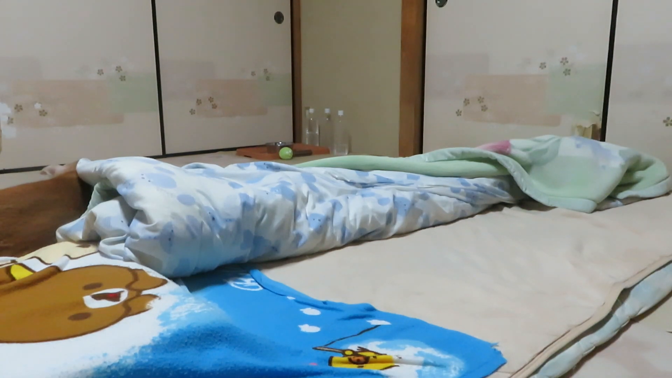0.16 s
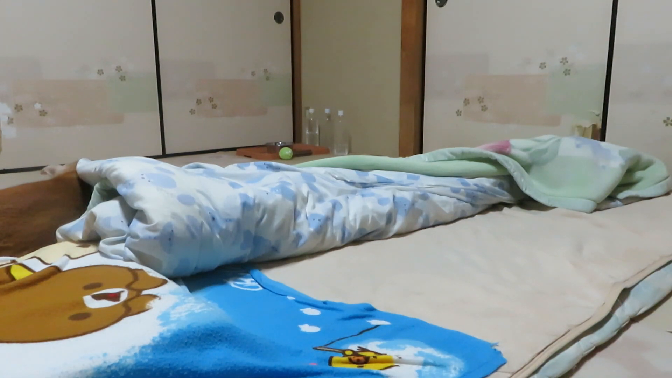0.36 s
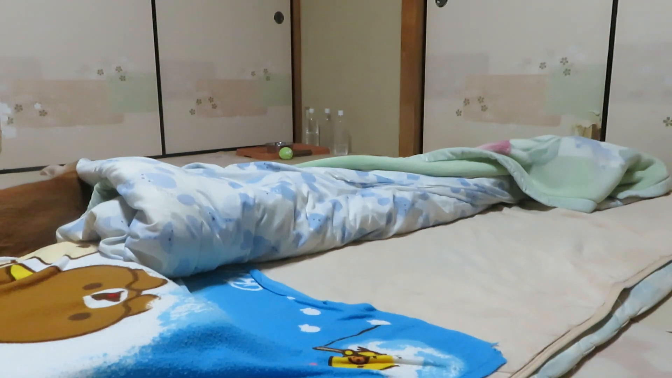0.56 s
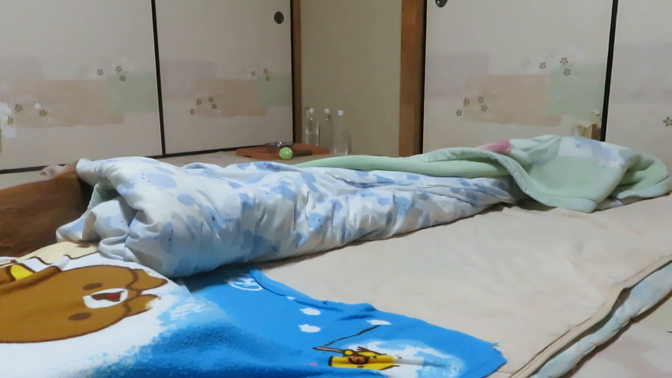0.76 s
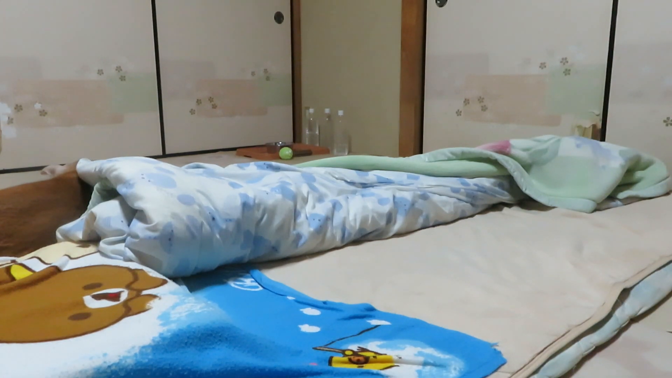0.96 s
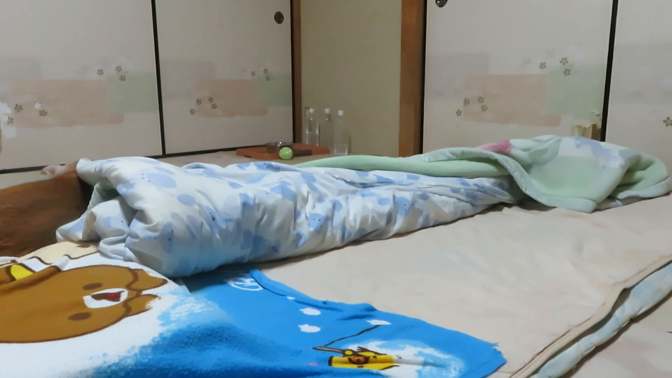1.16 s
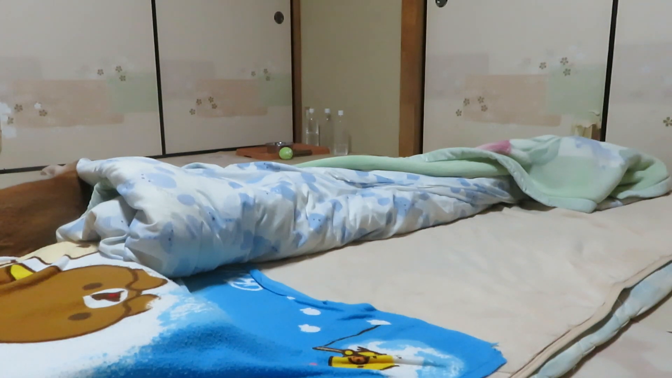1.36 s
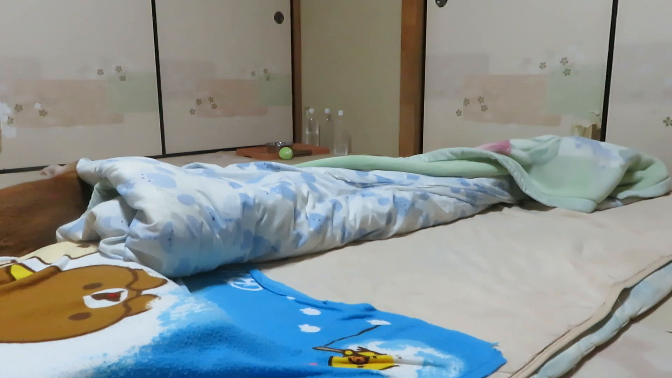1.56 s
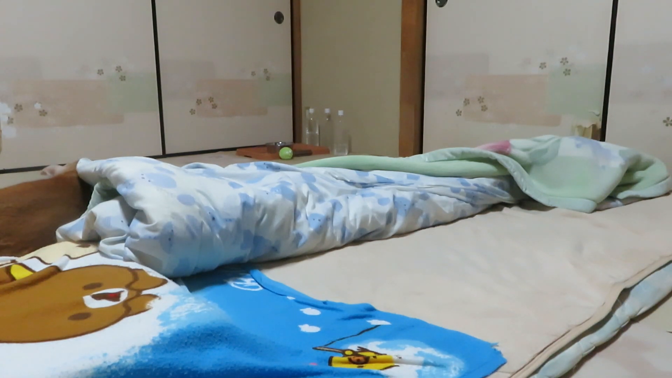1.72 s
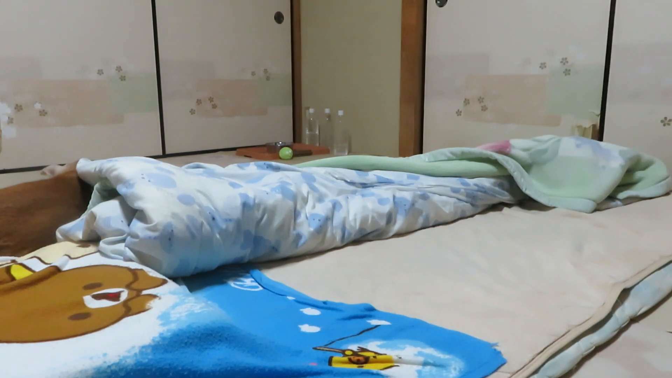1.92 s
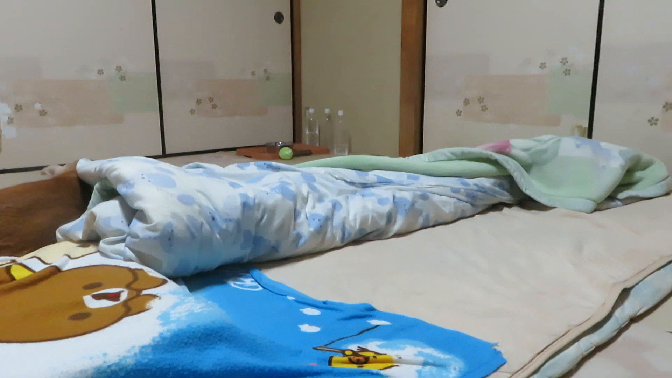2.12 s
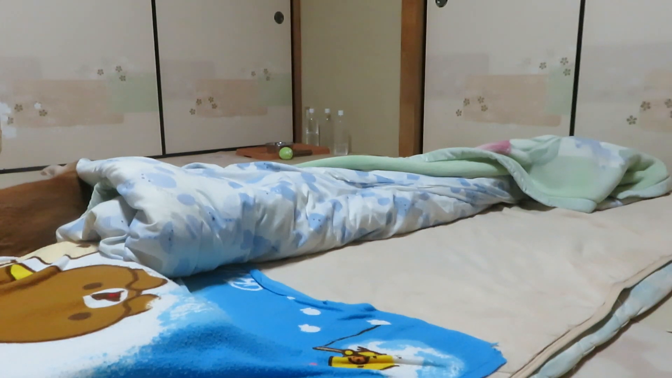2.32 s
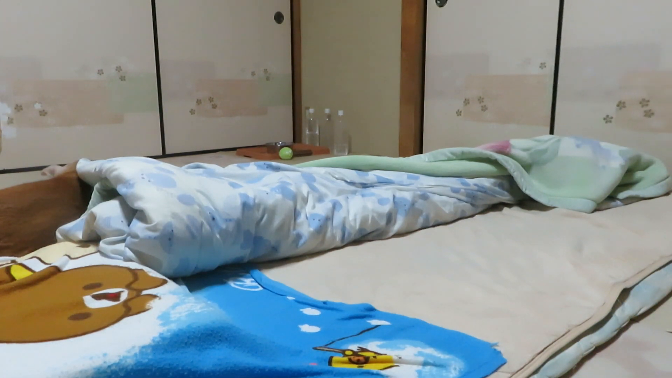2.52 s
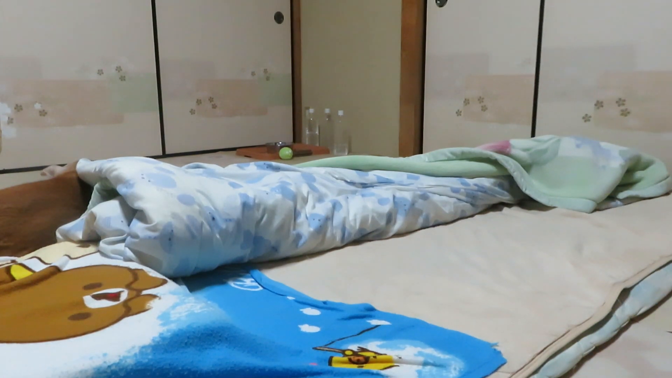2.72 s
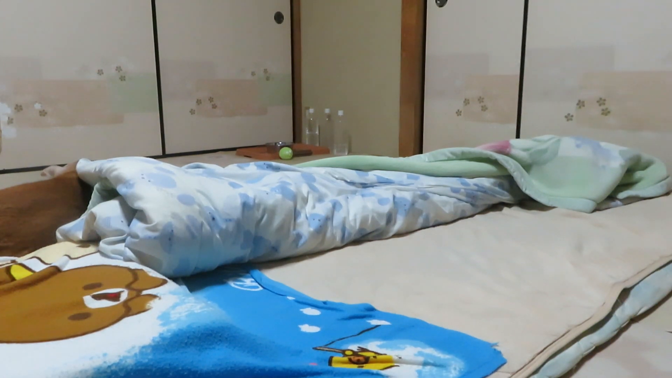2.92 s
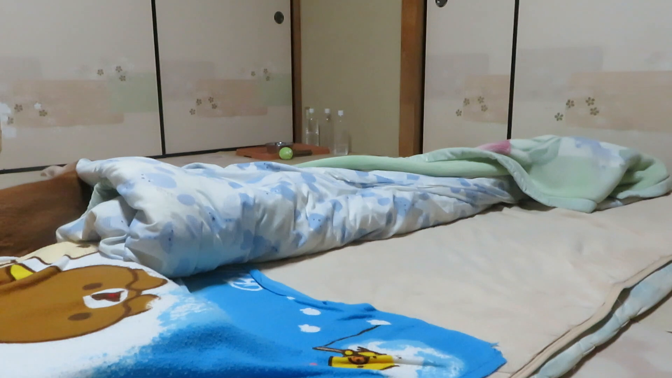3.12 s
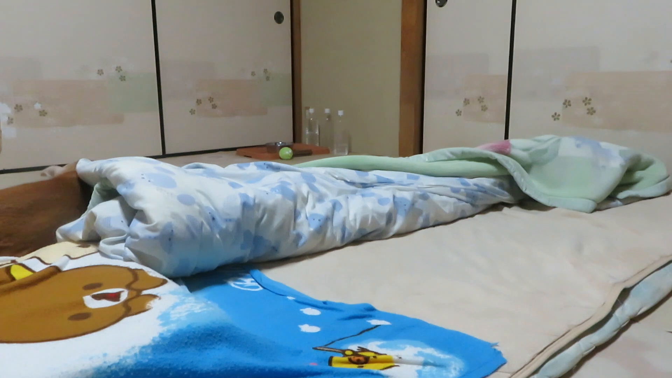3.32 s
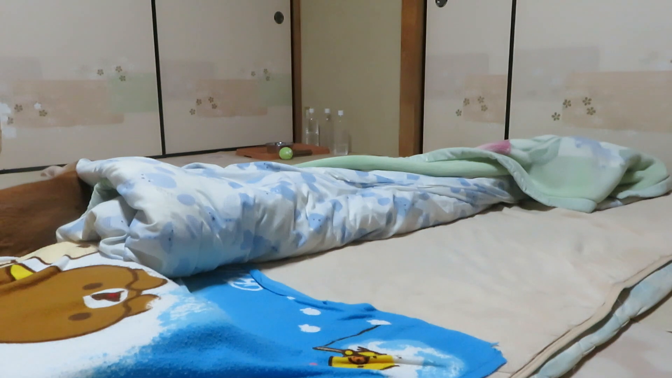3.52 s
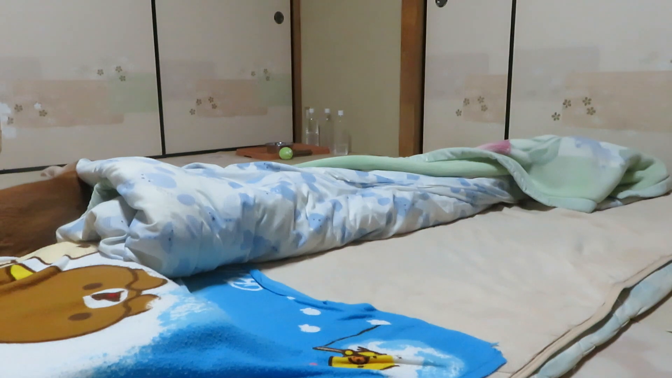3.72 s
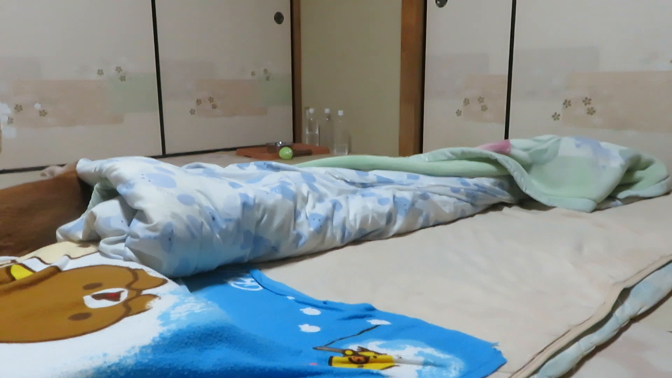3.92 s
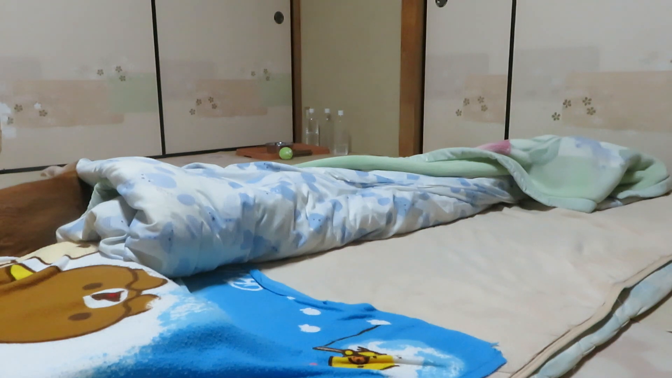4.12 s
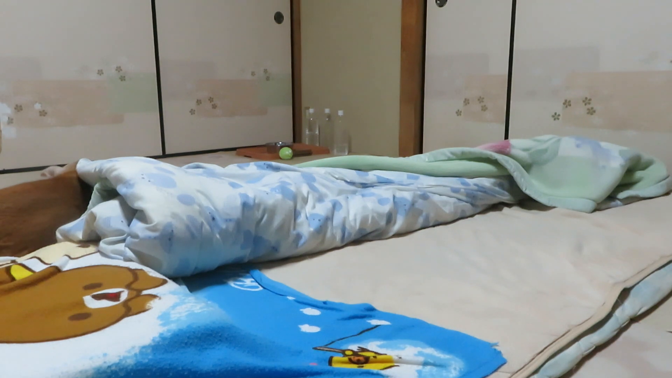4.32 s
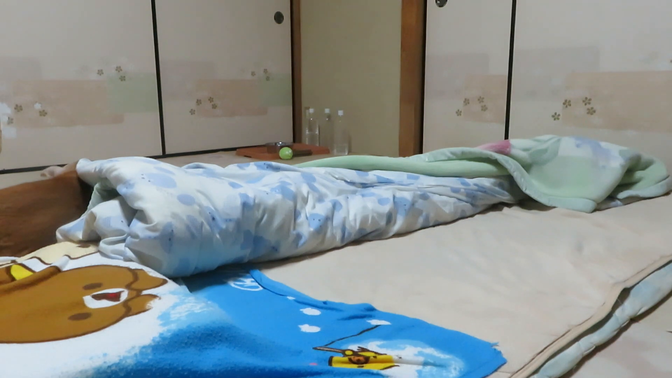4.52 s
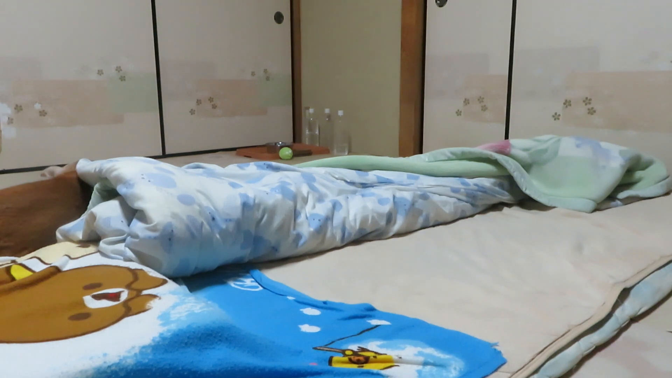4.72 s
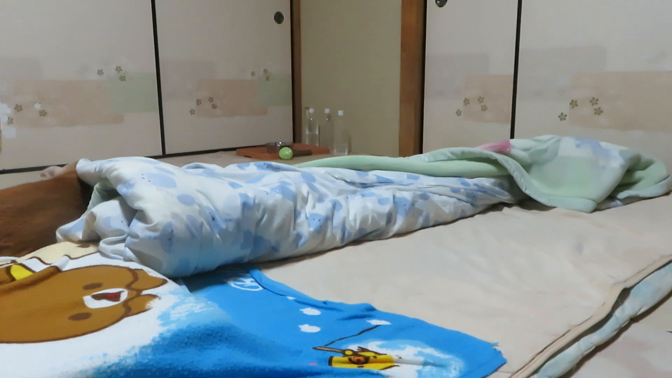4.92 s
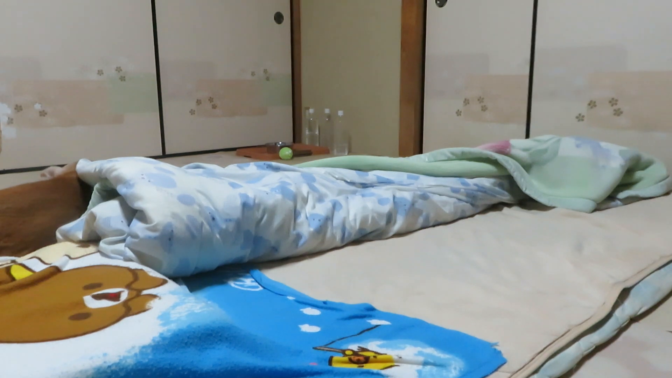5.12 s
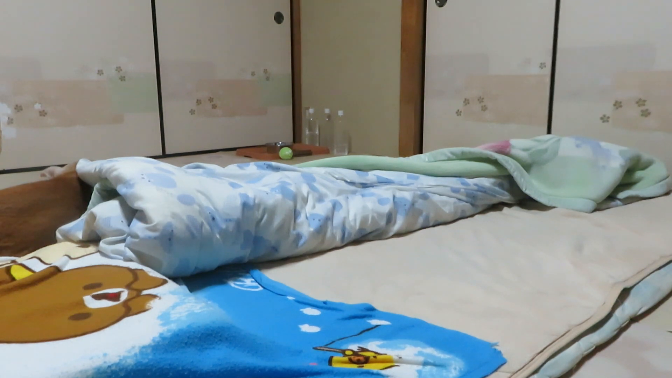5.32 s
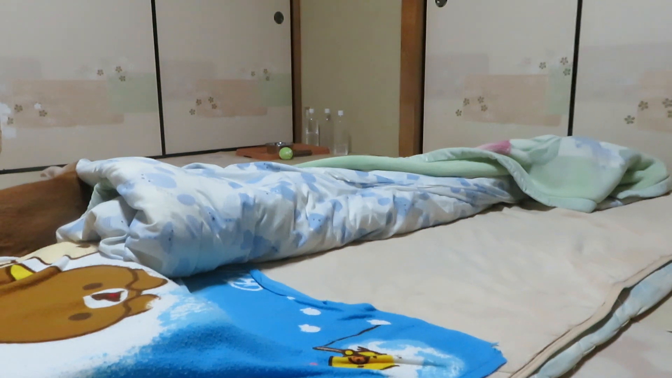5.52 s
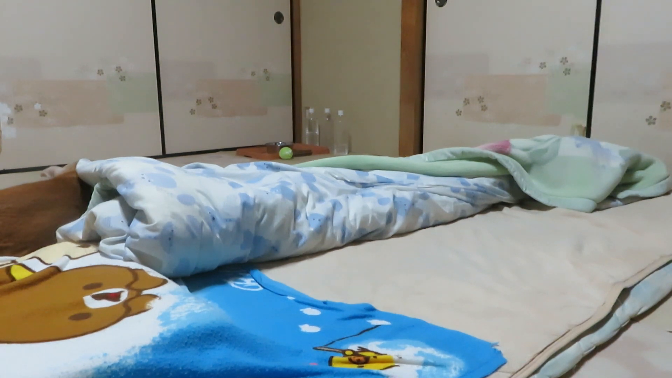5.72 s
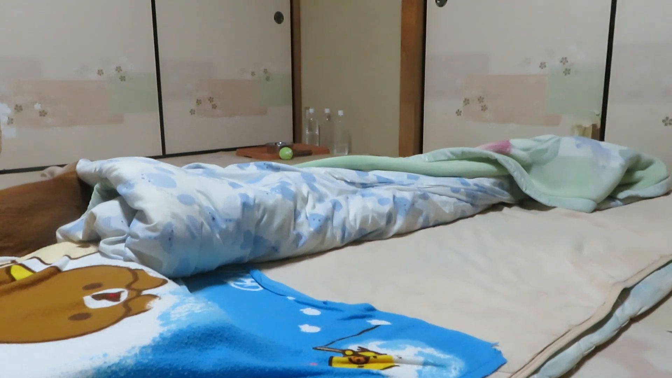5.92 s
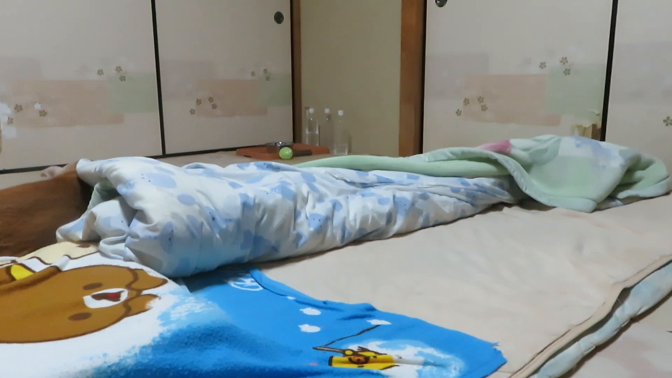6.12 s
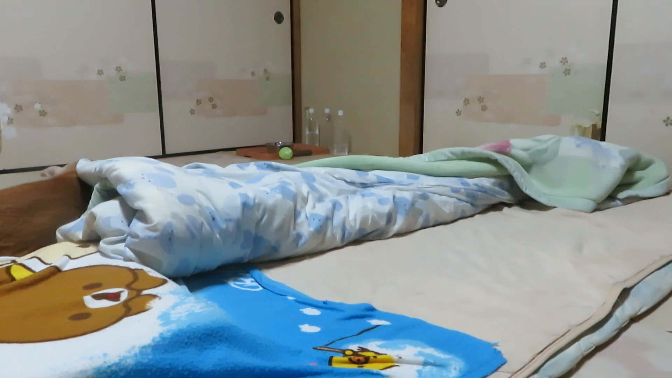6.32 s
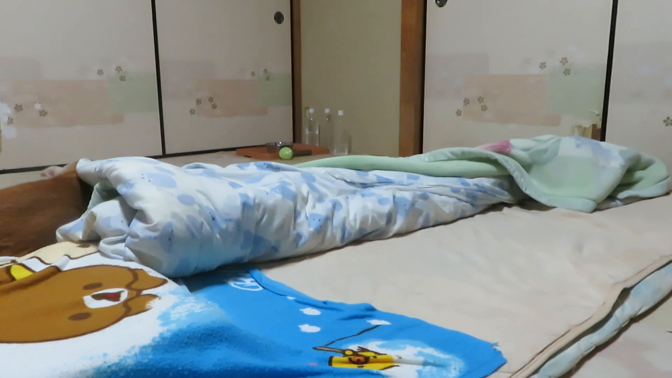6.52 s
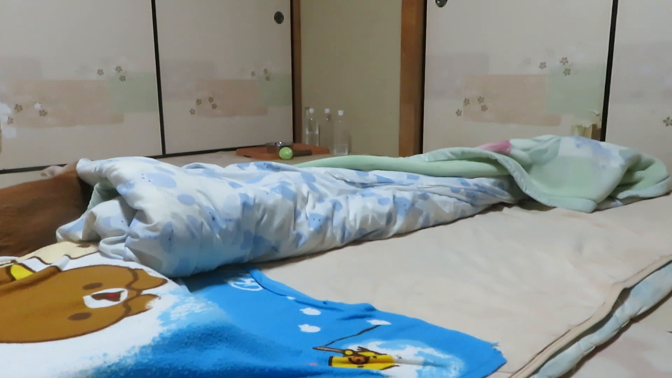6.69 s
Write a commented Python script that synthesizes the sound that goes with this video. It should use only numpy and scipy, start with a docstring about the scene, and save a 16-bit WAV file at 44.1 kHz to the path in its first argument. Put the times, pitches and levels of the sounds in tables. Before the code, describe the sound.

In a small room softened by bedding, the tail of a door bang fades over low hum and faint hiss. Soft footsteps boom in the floor with dull knocks. A light wooden sliding door rumbles and rattles along its groove, a metal pull chinking. After quiet steps and a sharp catch click, it slides again and slams into the post, overloading the microphone. A soft thump follows.

```python
"""First the tail of a door slam, turned down, over house hum and hiss; then knocks on the panel and soft steps
that boom in the floor. A light wooden sliding door is pushed along its groove twice in a small, soft-furnished
room: noise shakes floor, panel and frame, a metal pull chinks, a catch clicks, and the door slams into the post.
Struck parts are sums of decaying sines, rubbed parts are noise through resonances. The recorder clips the slam,
turns its gain down after it and creeps back up."""
import sys
import numpy as np
from scipy import signal
from scipy.fft import rfft, irfft, next_fast_len
from scipy.io import wavfile
from scipy.ndimage import uniform_filter1d, map_coordinates

SR = 44100
rng = np.random.default_rng(int(sys.argv[2]) if len(sys.argv) > 2 else 0)


def dump(signal):
    """Clip the signal to [-1, 1] and save it as 16-bit WAV at the path in sys.argv[1]."""
    limited = np.clip(np.atleast_2d(signal).T, -1, 1)
    pcm = np.round(limited * 32767).astype(np.int16)
    wavfile.write(sys.argv[1], SR, pcm)


N = 297879


def amp(db):
    """Decibels to a linear factor."""
    return 10 ** (np.asarray(db) / 20)


def unit(x):
    """Scale to an RMS of 1."""
    return x / np.sqrt(np.mean(x ** 2) + 1e-20)


def along(points, hz):
    """Read a curve of (Hz, value) points on a log frequency axis."""
    f, value = np.transpose(points)
    return np.interp(np.log(hz + 1), np.log(f + 1), value)


def filtered(x, response):
    """Multiply the spectrum of x by a response of frequency."""
    m = next_fast_len(x.shape[-1] + SR // 2)
    return irfft(rfft(x, m) * response(np.fft.rfftfreq(m, 1 / SR)), m)[..., :x.shape[-1]]


def resonances(modes):
    """Causal response of (Hz, width Hz, dB) modes, passed twice: once into the wood, once out."""
    def response(f):
        one_pass = 0
        for k, (centre, width, db) in enumerate(modes):
            mode = 1j * f * width / (centre ** 2 - f ** 2 + 1j * f * width)
            one_pass = one_pass + (-1) ** k * amp(db) * mode
        return one_pass ** 2
    return response


def stereo(mid, other, side):
    """Two close ports: an unrelated signal, shaped by side, is added to one and taken from the other."""
    other = filtered(other, lambda hz: amp(along(side, hz)))
    return np.array([mid + other, mid - other])


def add(out, s, sound):
    """Mix a sound in at s seconds; what lies outside is cut."""
    i = round(s * SR)
    part = sound[:, max(-i, 0):N - i]
    out[:, max(i, 0):][:, :part.shape[1]] += part


# How long the soft room holds each pitch. Each row: frequency in Hz, t60 in s.
ROOM_DECAY = [(60, 0.93), (150, 0.49), (500, 0.42), (1500, 0.38), (5000, 0.36), (12000, 0.087)]
# Stereo spread of the door, weak in the bass. Each row: frequency in Hz, side minus mid in dB.
DOOR_SPREAD = [(60, -52), (110, -36.5), (200, -49.5), (380, -22.5), (700, -27), (1290, -17), (2380, -14.5),
               (4400, -7.5), (8120, -2.5), (15000, 5.5)]


def in_room(x, wet_db):
    """The direct sound and a fresh noise tail, each frequency dying at its own speed."""
    hz, t, z = signal.stft(rng.standard_normal((2, SR)), SR, nperseg=512)
    decay = amp(-60 * t / along(ROOM_DECAY, hz)[:, None])
    tail = signal.istft(z * decay, SR, nperseg=512)[1][:, :SR]
    tail = tail / np.linalg.norm(tail[0])
    delayed = np.pad(x, (60, 0))[None]  # the walls answer 60 samples late
    mid, other = amp(wet_db) * signal.fftconvolve(delayed, tail, axes=1)[:, :SR]
    direct = np.pad(x, (0, SR - len(x)))
    return stereo(mid + direct, other, DOOR_SPREAD)


def ring(modes, scatter_db):
    """One blow on a body, peak 1: decaying sines whose strengths scatter anew each time."""
    t = np.arange(SR) / SR
    x = np.zeros(SR)
    for k, (hz, db, t60) in enumerate(modes):
        decay = amp(db + rng.normal(0, scatter_db) - 60 * t / t60)
        x += (-1) ** k * decay * np.sin(2 * np.pi * hz * t)
    x = x * (1 - np.exp(-t / 0.00063))  # the contact takes a moment
    return x / np.abs(x).max()


# Door against post. Each row: start in seconds, peak of the door's ring in dB before the recorder.
SLAMS = [(-.13, 7), (6.0742, 10)]
# Low notes of the struck door. Each row: frequency in Hz, strength in dB, t60 in s.
DOOR = [(96.3, -12, 0.33), (132, 4, .3), (190, -5.5, 0.42), (202.7, -9, .3), (236.5, -5.5, 0.33),
        (295, -12, 0.2), (356, -12, 0.2), (452, -15.5, .1), (563, -22.5, 0.07), (580, -9, 0.29),
        (687, -12.5, 0.32), (813, -9.5, 0.22), (1050, -22.5, 0.051)]
# Broad thud and crack of wood on wood. Each row: centre in Hz, width in Hz, dB of one pass.
CRACK = [(256, 720, 6)]
# The floor as a whole. Each row: centre in Hz, width in Hz, dB of one pass.
BOOM = [(40.7, 94, -9.5), (63.9, 57, -6)]
# The joist. Each row: centre in Hz, width in Hz, dB of one pass.
JOIST = [(88.6, 22, 0)]
SHUDDER_DB, SHUDDER_T60_S = -26.5, 1.42  # the floor after a slam, against the door's ring


def slams():
    """The door rings in its low modes; the crack of the contact fills the room and the floor shudders on."""
    out, blow = np.zeros((2, N)), np.zeros(SR)
    t = np.arange(SR) / SR
    blow[0] = -1
    # soft wood blunts the contact
    crack = filtered(blow, lambda hz: resonances(CRACK)(hz) / (1 + 1j * hz / 3800) ** 2)
    crack = crack / np.abs(crack).max()
    for s, db in SLAMS:
        add(out, s, in_room(amp(db - 10.5) * crack, wet_db=16))
        add(out, s + 0.0018, amp(db) * ring(DOOR, scatter_db=2) * np.ones((2, 1)))
        floor = unit(filtered(rng.standard_normal(SR), resonances(BOOM + JOIST)))
        shudder = amp(db + SHUDDER_DB - 60 * t / SHUDDER_T60_S) * floor
        add(out, s, shudder * np.ones((2, 1)))
    return out


# Colour of hum and hiss. Each row: frequency in Hz, relative density in dB per Hz.
QUIET = [(18, -15), (30, 6.5), (43, 8), (62, 1.5), (95, 3.5), (134, -2.5), (240, -12.5), (440, -14),
         (820, -18), (1500, -20.5), (2530, -22.5), (8000, -33.5), (15400, -47.5)]
# Stereo spread of hum and hiss. Each row: frequency in Hz, side minus mid in dB.
QUIET_SPREAD = [(60, -30), (110, -30.5), (200, -1), (380, 2), (700, -1), (1290, 0), (2380, -1.5),
                (4400, -1.5), (8120, -2.5), (15000, 2)]
QUIET_DB = -46.5  # RMS of the bed before its stereo spread and the recorder


def quiet():
    """The hum of the house and the hiss of the microphone, as steady coloured noise."""
    pair = unit(filtered(rng.standard_normal((2, N)), lambda hz: amp(along(QUIET, hz))))
    return amp(QUIET_DB) * stereo(*pair, QUIET_SPREAD)


# Dull knocks and scuffs.
# Each row: start in seconds, direct level in dB, centre in Hz, width in Hz of one pass, contact t60 in s.
KNOCKS = [(0.151, -54.5, 2460, 600, .05), (.5, -52.5, 1030, 1200, .05), (1.25, -61, 900, 1500, 0.51),
          (1.691, -51, 186, 197, 0.25), (1.813, -44, 384, 238, 0.21), (1.849, -44, 187, 198, 0.14),
          (1.915, -55.5, 1970, 1300, 0.11), (2.269, -49.5, 1330, 350, 0.57), (2.598, -41, 1340, 2250, 0.22),
          (2.675, -28.5, 488, 220, 0.25),  (3.442, -55.5, 3900, 6900, 0.0067),
          (3.884, -53.5, 200, 380, 0.29), (4.247, -38, 253, 307, 0.19), (4.247, -43, 710, 1890, 0.3),
          (4.29, -49.5, 500, 890, 0.11), (4.458, -50, 1390, 1720, 0.48), (5.865, -61, 3850, 8900, 0.027),
          (6.676, -42.5, 290, 201, 0.11), (6.7, -36, 135, 59.7, 0.27)]


def knocks():
    """A short rough contact through one broad resonance, heard directly, with a somewhat weaker room tail."""
    out, t = np.zeros((2, N)), np.arange(SR // 4) / SR
    for s, db, hz, width, t60 in KNOCKS:
        attack = np.minimum(t / (0.014 * t60), 1)
        contact = rng.standard_normal(len(t)) * amp(-60 * t / t60) * attack
        body = resonances([(hz, width, 0)])
        contact = filtered(contact, lambda f: body(f) / (1 + 1j * f / 6000))  # dull above 6 kHz
        contact = contact / contact[:900].std()  # level is set by the first 900 samples
        add(out, s, in_room(amp(db) * contact, wet_db=-3.0))
    return out


# Soft steps. Each row: start in seconds, level in dB before the swell, floor note in Hz.
STEPS = [(.2, -28, 101), (1.253, -28, 86.2), (1.418, -32, 94.2), (1.553, -27, 93.8), (1.7, -35.5, 102.6),
         (1.858, -27, 92.4), (3.884, -33, 88.3), (4.016, -35.5, 71.7), (4.254, -38, 103.5),
         (6.675, -27.5, 71)]
STEP_RISE_S, STEP_T60_S = 0.011, 0.33  # time constant of the swell, and the decay


def steps():
    """Each soft footfall swells into one note of the floor."""
    out, t = np.zeros((2, N)), np.arange(SR) / SR
    swell = 1 - np.exp(-t / STEP_RISE_S)
    for s, db, hz in STEPS:
        note = amp(db - 60 * t / STEP_T60_S) * swell * np.sin(2 * np.pi * hz * t)
        add(out, s, note * np.ones((2, 1)))
    return out


# Rumble, one list per push. Each row: time in seconds, rumble of the rail in dB, rumble of the floor in dB.
PUSHES = [
    [(1.97, -55, -63), (2.096, -44, -42), (2.174, -43, -42.5), (2.32, -28.5, -23), (2.418, -34.5, -32),
     (2.506, -29.5, -21), (2.554, -33, -31), (2.784, -27.5, -22.5), (2.904, -30.5, -36.5), (3.1, -40, -32),
     (3.158, -23.5, -28), (3.45, -58, -41.5), (3.72, -75, -53)],
    [(4.8, -60.5, -55), (4.968, -49, -69), (5.1, -33, -28), (5.37, -31.5, -31.5), (5.638, -34, -27.5),
     (5.662, -33, -16), (5.762, -33.5, -29), (5.804, -45, -31), (5.852, -35.5, -42), (5.928, -33, -18.5),
     (5.97, -37.5, -25), (6.016, -43, -34), (6.045, -33, -25)],
]
# Speed of each push, heard as scrape level. Each row: time in seconds, level in dB.
SPEED = [
    [(1.97, -79), (2.11, -60), (2.15, -53), (2.33, -47), (2.46, -40.5), (2.51, -45), (2.58, -48),
     (2.62, -44.5), (2.76, -42), (2.95, -44), (3.07, -49.5), (3.3, -51), (3.39, -61), (3.72, -92)],
    [(4.8, -57), (4.906, -53), (4.98, -44.5), (5.07, -44), (5.4, -44.5), (5.75, -47), (5.82, -53),
     (5.856, -53), (5.875, -43), (5.926, -54), (6.045, -61.5)],
]
# The panel's note in each push. Each row: time in seconds, level in dB.
PANEL_LEVEL = [
    [(1.97, -76), (2.076, -38.5), (2.324, -33.5), (2.35, -24), (2.564, -22.5), (2.602, -40), (2.68, -15.5),
     (2.826, -39), (2.87, -23), (3.104, -32), (3.154, -18.5), (3.486, -67.5), (3.568, -45), (3.72, -79)],
    [(4.8, -59), (5.004, -60), (5.034, -35.5), (5.176, -22.5), (5.222, -45), (5.256, -25.5), (5.36, -20.5),
     (5.384, -27), (5.51, -13), (5.762, -34), (5.786, -20), (5.96, -25), (5.994, -38), (6.045, -31)],
]
# The door binds and the frame rattles harder. Each row: start in seconds, length in s, rise in dB.
JUDDERS = [(2.403, 0.18, 4), (2.666, 0.11, 8)]
# The panel's resonance. Each row: centre in Hz, width in Hz, dB of one pass.
PANEL = [(126.1, 12.6, 0)]
# The rail's resonances. Each row: centre in Hz, width in Hz, dB of one pass.
RAIL = [(167.3, 33.3, 0.5), (209.7, 25, 3.5), (281.6, 78, -3)]
# The rattling frame. Each row: centre in Hz, width in Hz, dB of one pass.
FRAME = [(350.6, 38, 0), (448.8, 46.5, 1.5), (498.4, 47, -0.5), (584, 83, -3), (701, 110, -4.5),
         (853, 53, -6)]
# Colour of wood scraping on wood. Each row: frequency in Hz, relative density in dB per Hz.
SCRAPE = [(470, -19.5), (800, -5.5), (1190, -4.5), (1810, -4), (1980, -5.5), (3090, -8), (3810, -9.5),
          (11800, -31), (13800, -35), (15400, -42.5)]
BOOM_DB, JOIST_DB, FRAME_DB = 0, -2.5, -2  # each body against what drives it
FRAME_SHARE = 0.65  # the frame follows the rail's rumble by this share, the scrape by the rest
START_S, STOP_S = 0.09, 0.082  # the door gets under way, and settles
JUDDER_EDGE_S = 0.041  # rise of a judder; its fall takes twice as long
LUMPS_PER_S = 14  # bumps of the groove


def slide():
    """The rough groove shakes floor, panel, rail and frame, and wood scrapes on wood, all as shaped noise."""
    out, t = np.zeros((2, N)), np.arange(N) / SR
    bodies = [resonances(modes) for modes in (BOOM, JOIST, PANEL, RAIL, FRAME)]
    bodies.append(lambda hz: amp(along(SCRAPE, hz)))
    lumpiness_db = [0.96, 0.91, 0, 0.92, 0.5, 0.87]  # each body meets the bumps in its own way
    judder_db = np.zeros(N)
    for s, length, db in JUDDERS:
        corners = [s - JUDDER_EDGE_S, s, s + length, s + length + 2 * JUDDER_EDGE_S]
        judder_db += np.interp(t, corners, [0, db, db, 0])

    for push, speed, note in zip(PUSHES, SPEED, PANEL_LEVEL):
        start, stop = push[0][0], push[-1][0]
        moving = np.interp(t, [start - START_S, start, stop, stop + STOP_S], [0, 1, 1, 0])
        s, rail_points, floor_points = np.transpose(push)
        rail_db = np.interp(t, s, rail_points)
        floor_db = np.interp(t, s, floor_points)
        scrape_db = np.interp(t, *np.transpose(speed))
        note_db = np.interp(t, *np.transpose(note))
        frame_db = FRAME_DB + FRAME_SHARE * rail_db + (1 - FRAME_SHARE) * scrape_db + judder_db
        levels = [floor_db + BOOM_DB, floor_db + JOIST_DB, note_db, rail_db, frame_db, scrape_db]
        for db, body, lumpy_db in zip(levels, bodies, lumpiness_db):
            roughness_db = unit(uniform_filter1d(rng.standard_normal(N), 130))
            grit = rng.standard_normal((2, N)) * amp(roughness_db)
            pair = filtered(grit, body)
            # each body's noise is partly levelled, so it sounds steadier
            power = np.abs(uniform_filter1d(pair[0] ** 2, 2200))
            pair /= np.sqrt(power) ** 0.67
            lumps = map_coordinates(rng.standard_normal(256), [t * LUMPS_PER_S])
            out += moving * amp(db) * unit(pair * amp(lumpy_db * lumps))
    return stereo(*out, DOOR_SPREAD)


# The metal pull rattles. Each row: start in seconds, direct peak in dB.
CHINKS = [(2.942, -25.5), (2.952, -28), (2.966, -33.5), (2.988, -35), (3.032, -40.5)]
# Notes of the pull. Each row: frequency in Hz, strength in dB, t60 in s.
PULL = [(1796, -7, 0.063), (1940, -14, 0.043), (3370, -12, 0.0089), (2530, -9, 0.027), (915, -17, 0.061),
        (3900, -8.5, 0.0097), (5150, -10, 0.009)]
# The catch. Each row: start in seconds, direct peak in dB.
CLICKS = [(4.5805, -14.5), (4.586, -22.5)]
# Notes of the catch. Each row: frequency in Hz, strength in dB, t60 in s.
CATCH = [(1246, 22, 0.0029), (1010, -16, 0.017), (1530, -19, 0.0063), (1910, -1, 0.0073), (2250, 8, 0.0045),
         (2970, -3.5, 0.009), (3310, 4, 0.0076), (3000, -7, .006), (4720, -12.5, 0.017), (4920, -16, 0.013),
         (7100, -13.5, 0.0057), (443, -34, 0.032)]


def hardware():
    """The pull chinks and the catch clicks: small struck parts ring briefly in the room."""
    out = np.zeros((2, N))
    for s, db in CHINKS:
        add(out, s, in_room(amp(db) * ring(PULL, scatter_db=1), wet_db=-0.5))
    for s, db in CLICKS:
        add(out, s, in_room(amp(db) * ring(CATCH, scatter_db=2), wet_db=-3))
    return out


# How the door's sounds lean to one side. Each row: frequency in Hz, left minus right in dB.
LEAN = [(125, 0), (500, -.7), (1000, -1.2), (4000, -1.2), (12000, 0)]


def scene():
    """The door's sounds lean slightly to the right; steps and quiet stay centred."""
    door = slams() + knocks() + slide() + hardware()
    halves = np.array([[.5], [-.5]])  # left and right share the difference
    door = filtered(door, lambda hz: amp(along(LEAN, hz) * halves))
    return door + steps() + quiet()


CLIMB_DB_PER_S = 10.02  # the gain creeps back
TOP_HZ = 15620  # nothing passes above


def record(dry):
    """Loud sound cuts the gain within about 20 ms; it returns at a steady dB rate. Then clipping and band limit."""
    t = np.arange(N) / SR
    # little deep bass gets through the microphone
    dry = filtered(dry, lambda hz: (1j * hz / (20 + 1j * hz)) ** 2)
    power = np.abs(uniform_filter1d(dry.mean(0) ** 2, 300, origin=149))  # mean of the latest samples
    level_db = 10 * np.log10(power + 1e-12)
    wanted_db = np.maximum(6 * (level_db + 4.5), 0)  # cut above -4.5 dB
    wanted_db = np.minimum(wanted_db, 15.5)  # the deepest cut
    wanted_db[0] = 16  # still turned down after the earlier slam
    climb_db = CLIMB_DB_PER_S * t
    held_db = np.maximum.accumulate(wanted_db + climb_db) - climb_db
    cut_db = uniform_filter1d(held_db, size=800, origin=340)
    x = dry * amp(-np.maximum(cut_db, 0))
    x = x / (1 + np.abs(x) ** 8) ** (1 / 8)  # clipping with a slightly rounded knee
    return filtered(x, lambda hz: hz < TOP_HZ)


dry = scene()
out = record(dry)
dump(out)
```